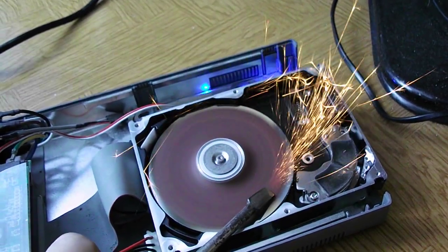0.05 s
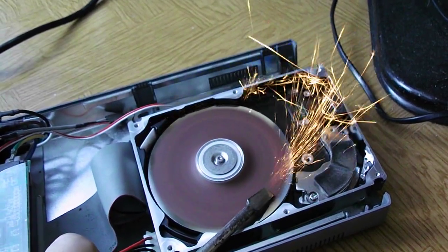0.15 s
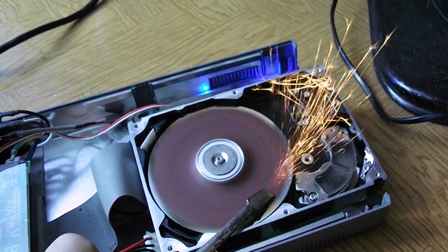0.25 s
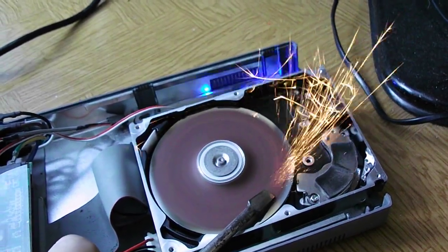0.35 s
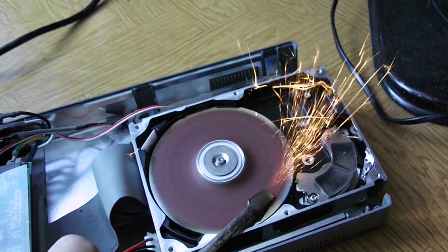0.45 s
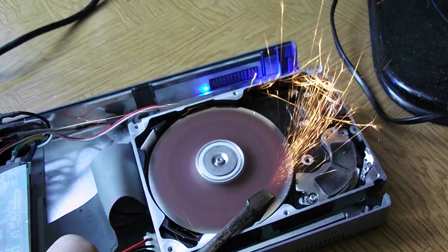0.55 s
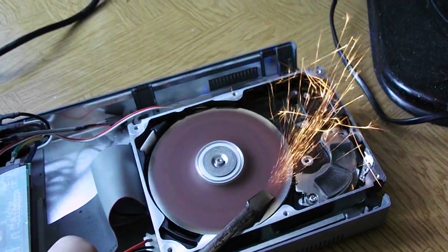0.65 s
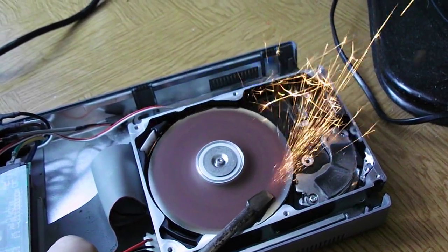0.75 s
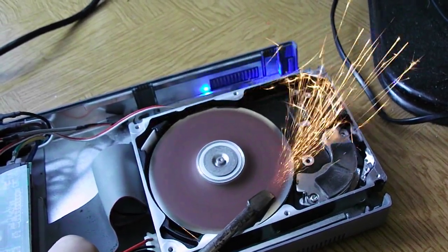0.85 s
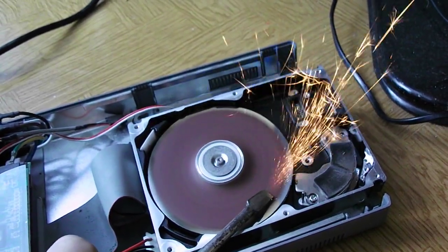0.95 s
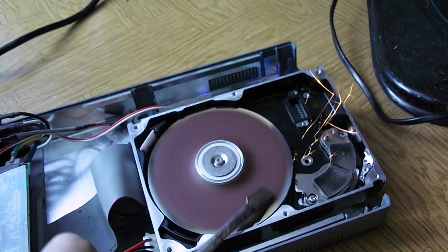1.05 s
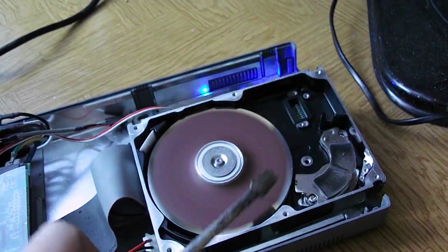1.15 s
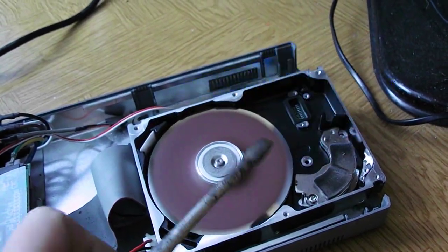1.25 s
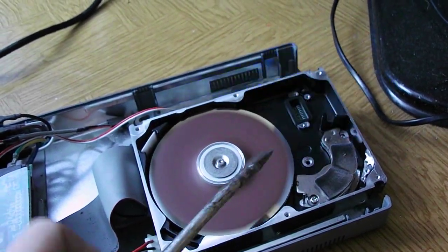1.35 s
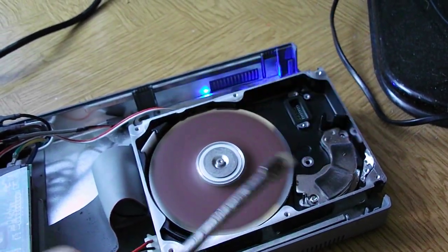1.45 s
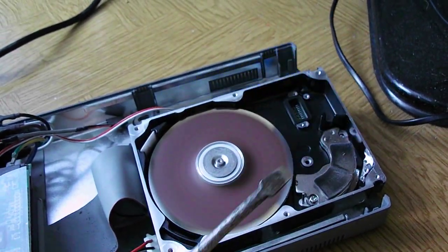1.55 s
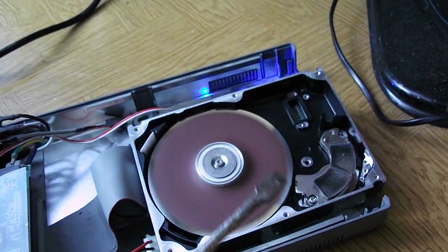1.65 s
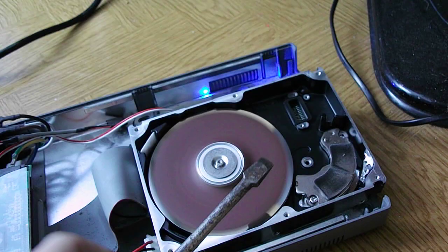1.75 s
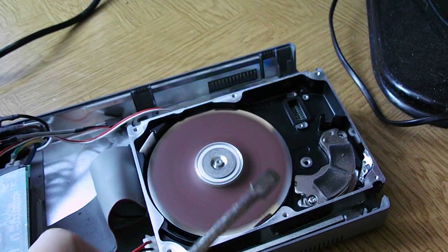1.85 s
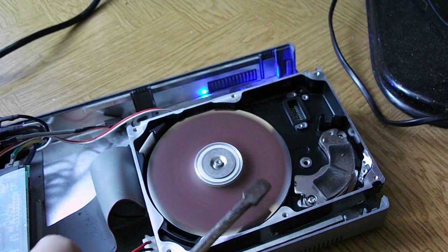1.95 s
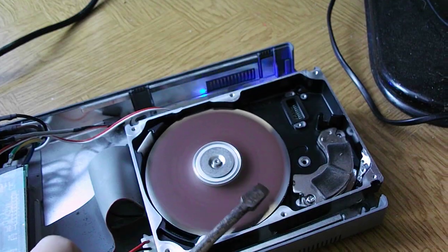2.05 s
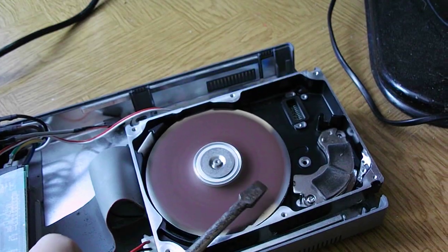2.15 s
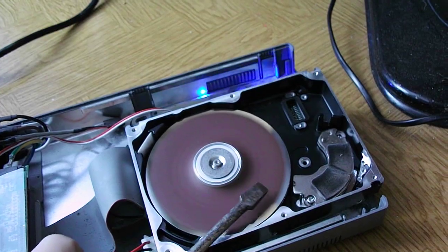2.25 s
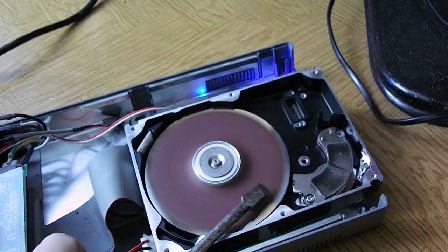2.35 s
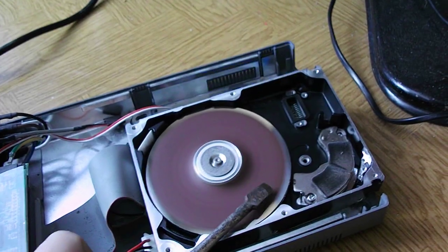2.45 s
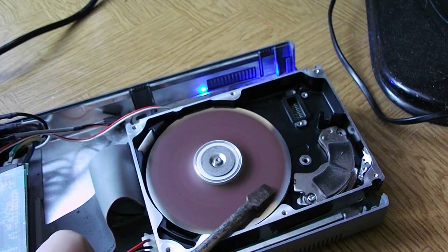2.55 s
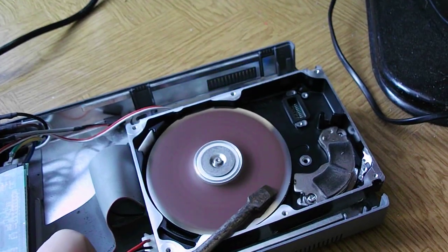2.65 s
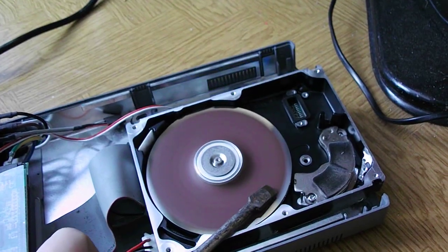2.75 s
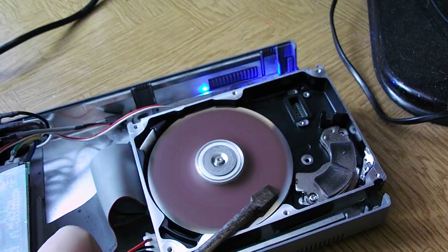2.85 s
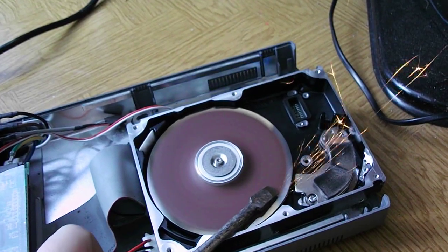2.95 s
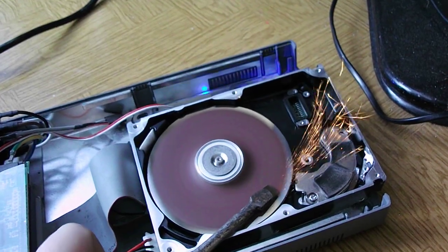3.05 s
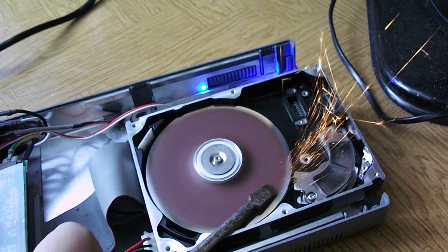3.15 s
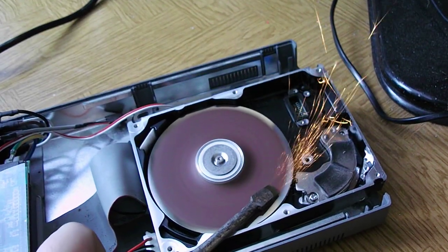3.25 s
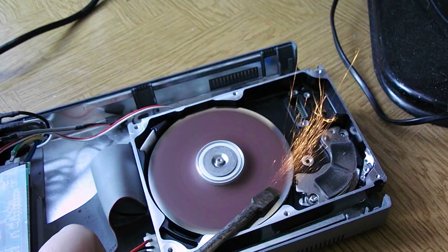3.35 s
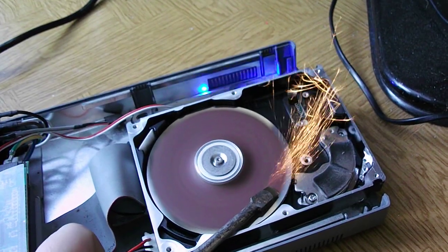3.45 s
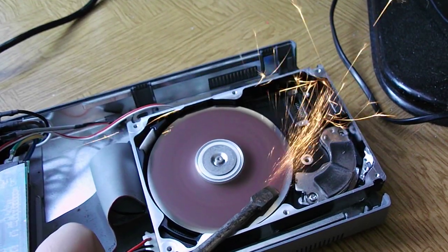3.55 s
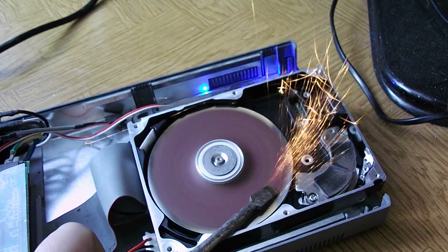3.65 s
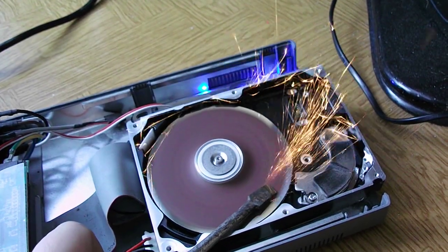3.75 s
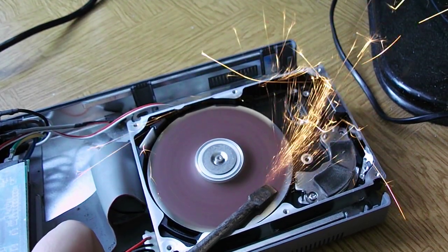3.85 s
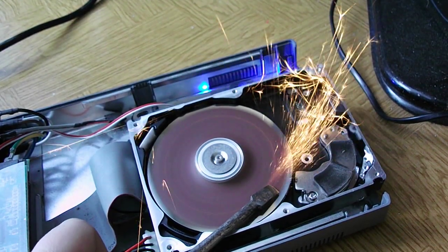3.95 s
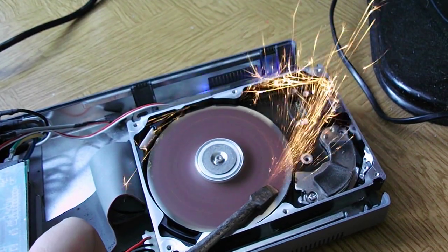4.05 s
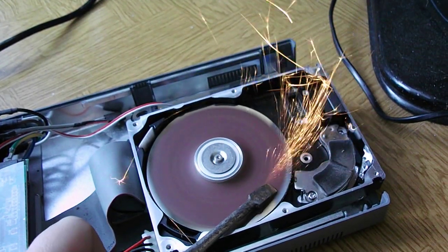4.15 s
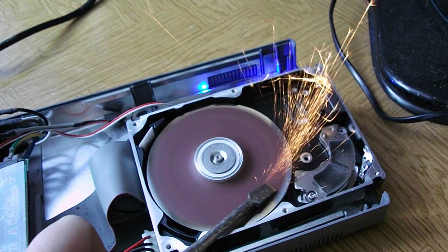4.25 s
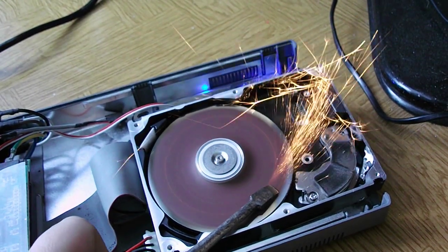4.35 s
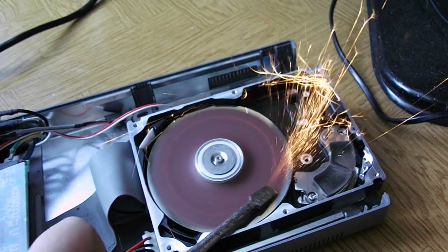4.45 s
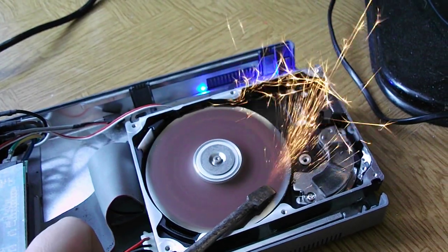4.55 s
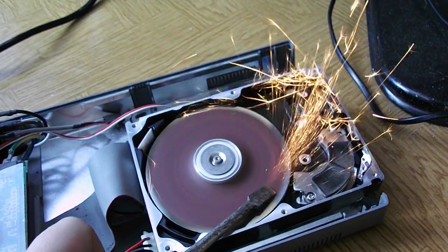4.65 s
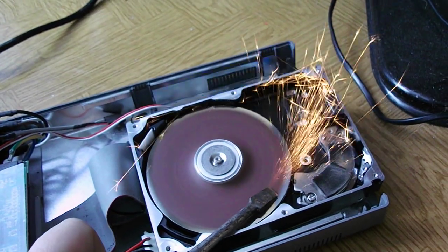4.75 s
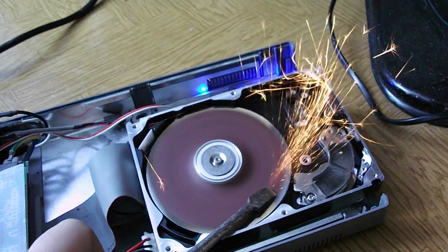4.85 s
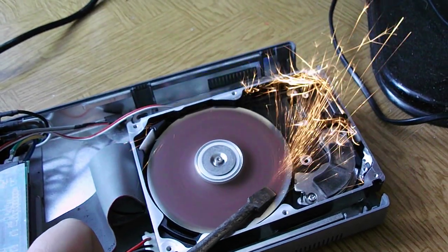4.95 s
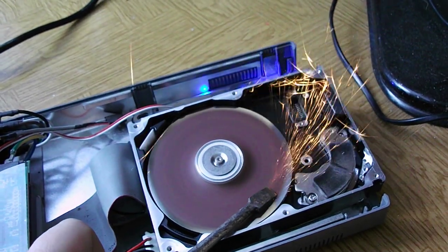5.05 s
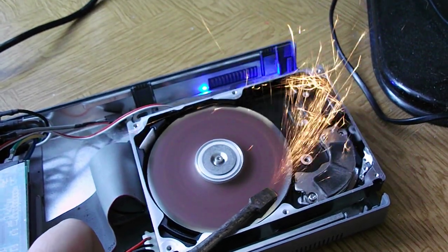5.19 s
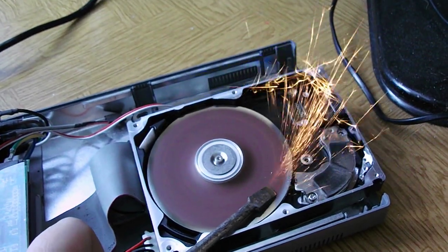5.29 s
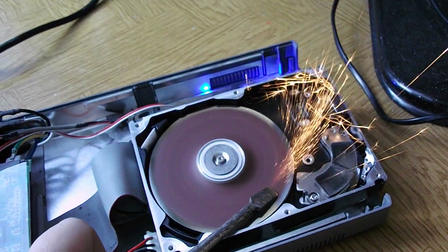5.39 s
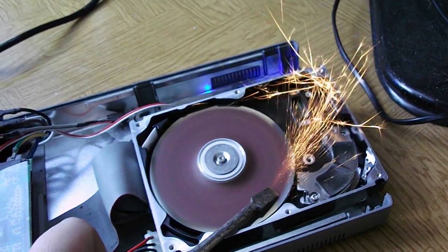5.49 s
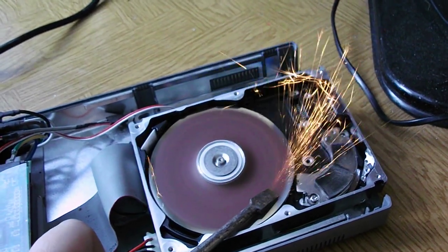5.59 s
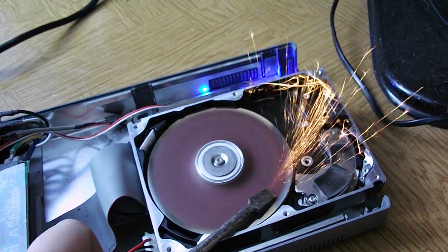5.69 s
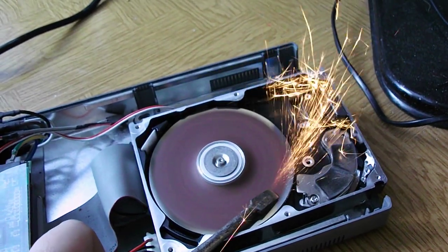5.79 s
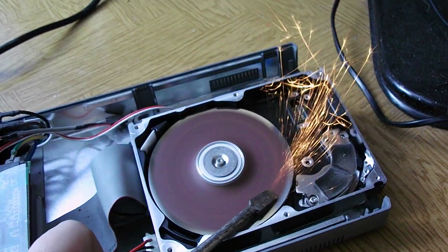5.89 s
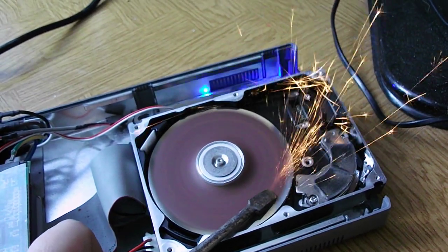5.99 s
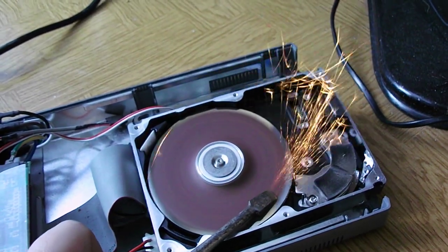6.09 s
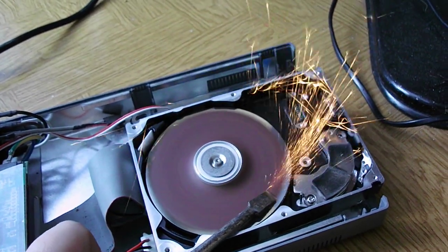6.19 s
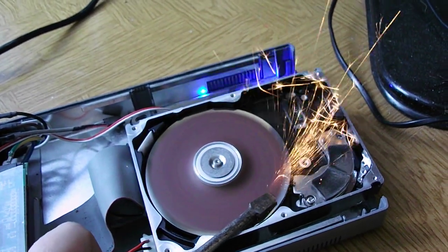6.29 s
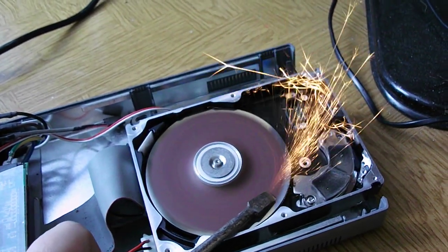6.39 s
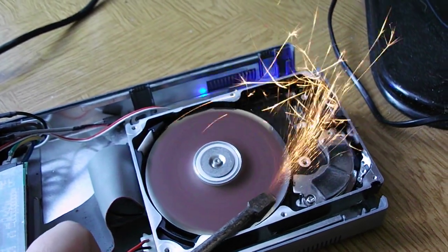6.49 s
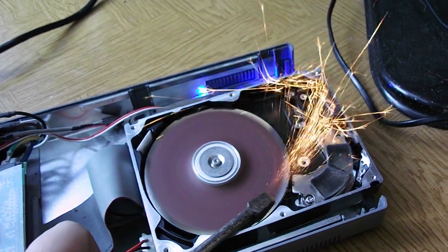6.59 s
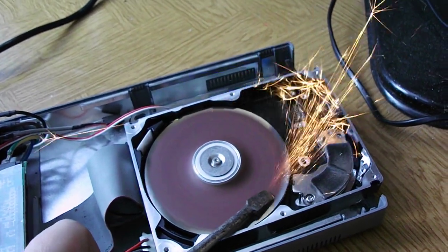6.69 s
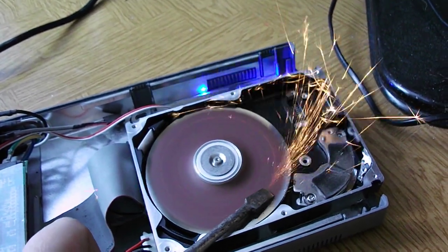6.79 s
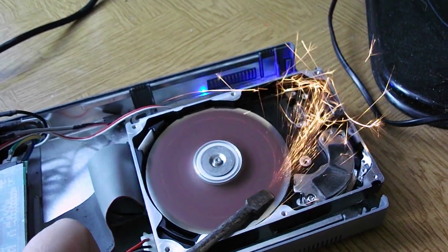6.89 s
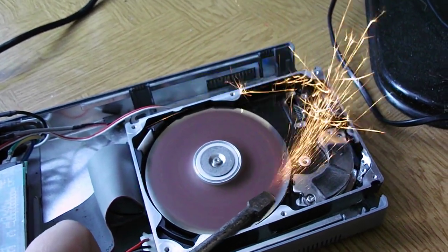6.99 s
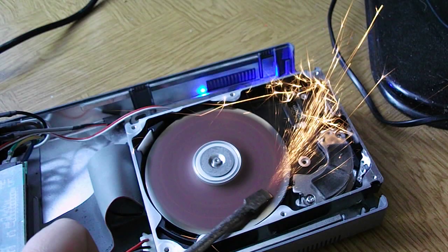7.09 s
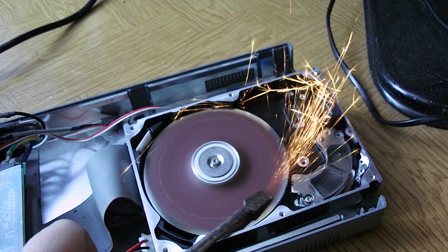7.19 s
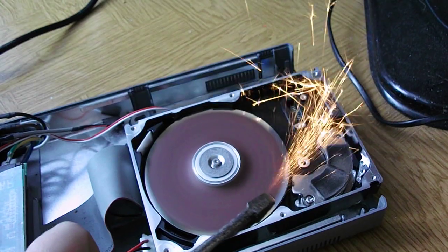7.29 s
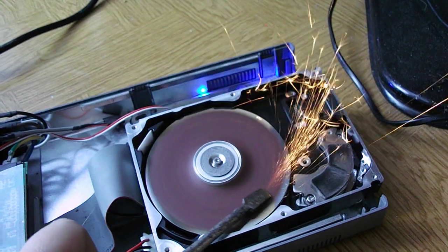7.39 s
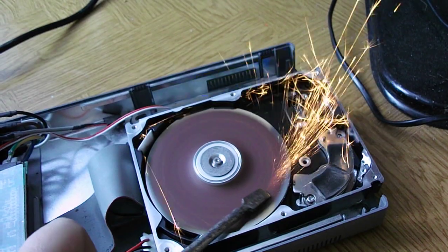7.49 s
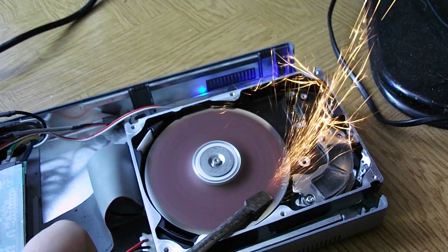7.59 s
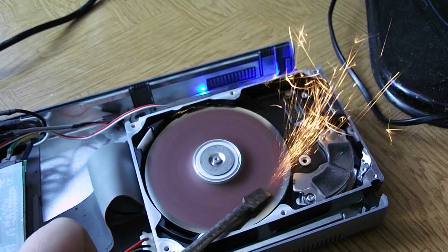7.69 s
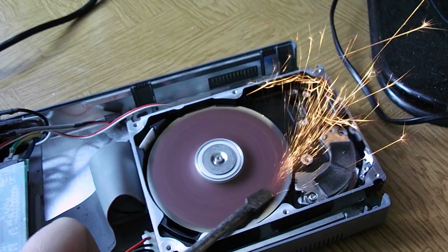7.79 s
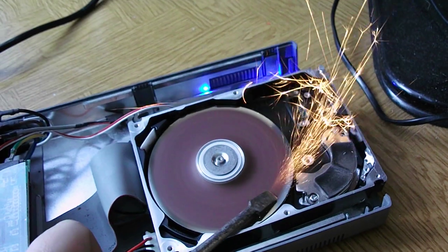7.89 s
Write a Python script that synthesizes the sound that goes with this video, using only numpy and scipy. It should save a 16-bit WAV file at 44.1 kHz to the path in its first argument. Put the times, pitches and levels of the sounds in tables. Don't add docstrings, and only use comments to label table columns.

```python
import sys
import numpy as np
from scipy import signal
from scipy.fft import rfft, irfft, next_fast_len
from scipy.io import wavfile
from scipy.ndimage import uniform_filter1d, map_coordinates

SR = 44100
rng = np.random.default_rng(int(sys.argv[2]) if len(sys.argv) > 2 else 0)


def boost_factor(decibels):
    exponent = np.asarray(decibels, float) / 20
    return 10 ** exponent


def digitize_waveform(pressure):
    field = np.atleast_2d(pressure).T
    bounded = np.clip(field, -1, 1)
    quanta = np.round(bounded * 32767).astype(np.int16)
    wavfile.write(sys.argv[1], SR, quanta)


N = 349707
T_S = np.arange(N) / SR


def unit(x):
    return x / np.sqrt(np.mean(x ** 2) + 1e-20)


def along(points, hz):
    f, v = np.transpose(points)
    return np.interp(np.log(hz + 1), np.log(f + 1), v)


def curves(rows):
    s, *cols = np.transpose(rows)
    return [np.interp(T_S, s, c) for c in cols]


def wobble(rate_hz):
    knots = rng.standard_normal(int(N * rate_hz / SR) + 4)
    return map_coordinates(knots, [np.arange(N) * rate_hz / SR])


def order(k, turns, phase=0):
    return np.sin(2 * np.pi * k * turns + phase)


def peaks(modes, hz):
    return 1 + sum((boost_factor(db) - 1) / (1 + (2 * (hz - centre) / width) ** 2) for centre, width, db in modes)


def coloured(x, gain):
    m = 8192
    cepstrum = irfft(np.log(gain(np.fft.rfftfreq(m, 1 / SR)) + 1e-6), m)
    cepstrum[1:m // 2] *= 2
    cepstrum[m // 2 + 1:] = 0
    return unit(signal.oaconvolve(x, irfft(np.exp(rfft(cepstrum)), m))[:N])


def band(hz, lo, hi):
    return np.sqrt(1 / (1 + (hz / hi) ** 12) - 1 / (1 + (hz / (lo + 1e-3)) ** 12) + 1e-9)


def steady(x, size):
    return x / np.sqrt(np.abs(uniform_filter1d(x ** 2, size)) + 1e-9)


def tipped(x, hz, db):
    under = signal.sosfiltfilt(signal.butter(6, hz, fs=SR, output="sos"), x)
    return boost_factor(db / 2) * under + boost_factor(-db / 2) * (x - under)


def patchy(x, depth_db):
    z = signal.stft(x, nperseg=512)[2]
    field = rng.standard_normal(z.shape)
    for size, axis in [(4, 0), (20, 1)] * 2:
        field = uniform_filter1d(field, size=size, axis=axis)
    return signal.istft(z * boost_factor(depth_db * unit(field)), nperseg=512)[1][:N]


CELLS = 340


def surface(rows, cells, memory, blur):
    fresh = rng.standard_normal((rows + 100, cells))
    worn = signal.lfilter([1], [1, -np.exp(-1 / memory)], fresh, axis=0)[100:]
    for _ in range(2):
        worn = uniform_filter1d(worn, blur, 1, mode="wrap")
    return unit(worn)


def passing(pairs, turns):
    return map_coordinates(pairs.ravel(), [turns * CELLS], mode="nearest")


# start_s, speed_turns_per_s
SPEED = [(0, 122.6), (1.04, 122.1), (1.24, 126.0), (1.5, 131.7), (1.84, 137.3), (2.24, 142.7),
         (2.64, 146.3), (3.1, 149.3), (3.44, 148.1), (3.7, 145.5), (4.04, 140.0), (4.44, 135.6),
         (4.84, 130.7), (5.44, 126.2), (5.84, 124.4), (6.44, 124.2), (6.7, 123.4), (7.93, 122.1)]


def shaft():
    speed, = curves(SPEED)
    return np.cumsum(speed) / SR, speed


LIFT_S, LAND_S, LIFT_FADE_S, LAND_FADE_S = 1.048, 2.925, 0.073, 0.0099


def touching():
    return np.clip(np.maximum(1 - (T_S - LIFT_S) / LIFT_FADE_S, (T_S - LAND_S) / LAND_FADE_S), 0, 1)


LOW_GAIN_DB, WAIT_S, RECOVER_DB_PER_S = -17.5, 0.16, 44.5


def quiet_gain_db():
    return np.clip(LOW_GAIN_DB + RECOVER_DB_PER_S * (T_S - LIFT_S - WAIT_S), LOW_GAIN_DB, 0)


# start_s, pressure_db, lean_db (on the case), grip_db, edge_db
HAND = [(0, -17, -3.5, 1.5, 1), (.4, -15, -5, 8.5, -0.5), (1.05, -15, -7, 5, 1), (3.0, -21, -1.5, -8, 1.5),
        (3.2, -18, -5, -2, 9.5), (3.3, -13, -10, 15, -1), (3.56, -21, 7, -5, 0.5), (4.0, -18, 2.5, 3, -0.5),
        (4.12, -17, 2.5, -1.5, -2), (4.4, -20, 1, 2.5, 2), (4.7, -16, -1, 3.5, 0), (5.05, -16, -2.5, 14, 1),
        (5.22, -20, 1.5, 0, 4), (5.45, -17.5, -3.5, 0, 2.5), (6.0, -15.5, -0.5, -3, 1.5),
        (6.42, -17.5, -4, 3.5, -0.5), (6.78, -17, 0, -2.5, -1), (7.1, -16.5, -3.5, 0.5, 1)]


def hand():
    return curves(HAND)


def whistle():
    tone = boost_factor(0.54 * quiet_gain_db() - 46) * np.sin(2 * np.pi * 15625 * T_S)
    hiss = boost_factor(-60) * coloured(rng.standard_normal(N), lambda hz: band(hz, 3000, 13500))
    return (1 - touching()) * tone + hiss


# freq_hz, level_db
RUMBLE = [(12, -32), (20, -2), (65, -3), (78, -3), (91, -24), (110, 0), (140, -27), (240, -120)]


def rumble():
    level_db = np.interp(T_S, [0, 1.2, 2.9, 3.1], [-53.5, -57, -52, -60]) + 6.7 * wobble(5.0)
    return boost_factor(level_db) * coloured(rng.standard_normal(N), lambda hz: boost_factor(along(RUMBLE, hz)))


# start_s, peak_db
KNOCKS = [
    (0.168, -49),
    (1.189, -57),
    (3.339, -29),
    (3.569, -31),
]


def knocks():
    out = np.zeros(N)
    u = np.arange(SR // 10) / SR / 0.0064
    push = u * (1 - u / 2.3) * np.exp(-u)
    for start_s, peak_db in KNOCKS:
        out[round(start_s * SR):][:len(u)] -= boost_factor(peak_db + 10) * push
    return out


# shaft_hz, first_db, next_db, first_load_db, next_load_db
TABLE_ANSWER = [(117, -37, -32, -54, -63), (120, -36, -35, -54, -60), (131, -39.5, -35.5, -56, -48),
                (138.3, -36.5, -36.5, -56, -48), (143.8, -33, -33.5, -56, -49), (145.8, -29, -38, -46, -50),
                (150.6, -36.5, -45, -40, -53)]
# shaft_multiple, level_db
HUM_ORDERS = [
    (.5, -27),
    (1.5, -14.5),
    (2, 0.5),
    (2.5, -14.5),
    (3, -7.5),
]


def hum(turns, speed):
    hz, *columns = np.transpose(TABLE_ANSWER)
    first_db, next_db, first_load_db, next_load_db = [np.interp(speed, hz, c) for c in columns]
    on, gain_db = touching(), quiet_gain_db()
    upper = sum(boost_factor(db + 0.61 * wobble(12)) * order(k, turns, k) for k, db in HUM_ORDERS)
    first = on * boost_factor(first_load_db) + (1 - on) * boost_factor(first_db + gain_db)
    more = on * boost_factor(next_load_db + 4.1 * wobble(4.5)) + (1 - on) * boost_factor(next_db + gain_db)
    return boost_factor(4.0) * first * order(1, turns) + more * upper


# shaft_multiple, level_db
POLE_ORDERS = [(9, -1), (36, 1), (54, -23), (72, 2), (90, -4)]
# freq_hz, level_db (against the rush)
WHINE_MODES = [(1130, -7.5), (1260, -26), (4450, -15), (4780, -5), (4940, 2.5), (5040, -10), (5350, -15),
               (8850, -9.5), (9400, -9.5), (9600, 3.5), (9780, -17), (10080, -4.5), (10400, -26),
               (10700, -45)]


def whine(turns, speed):
    out = 0
    for k, db in POLE_ORDERS:
        out = out + boost_factor(db + 1.5 * wobble(25.74) + along(WHINE_MODES, k * speed)) * order(k, turns)
    return out


# freq_hz, level_db
RUSH = [(120, -81), (200, -5.5), (333, -23), (584, -9.5), (800, -13.5), (1560, -11), (2600, -6.5),
        (5000, -7), (9000, -18), (12000, -26.5), (14300, -44), (14700, -72)]
# freq_hz, width_hz, level_db
LOOSE = [(1230, 280, 11.9), (2130, 370, 12.2), (2990, 450, 12.1), (4740, 160, 4.2), (6760, 105, 10.6),
         (7610, 49, 11.7), (12900, 290, 17.6)]
MID_SPIN_HZ, RIM_SPLIT_HZ, RIM_TOP_HZ = 141.7, 3700, 30000
RUSH_DB, RUSH_DB_PER_HZ, HISS_DB, HISS_DB_PER_HZ = -18, 0.23, -1, -0.13
SHADE_S, SHADE_LONG_S, SHADE_DB = 2.8, 0.073, -4.5
RATTLE_DB, RATTLE_DB_PER_HZ, RATTLE_LEAN = -28, 0.82, 0.25


def free_running(turns, speed):
    faster = speed - MID_SPIN_HZ
    low_db = RUSH_DB + RUSH_DB_PER_HZ * faster + quiet_gain_db()
    shade_db = SHADE_DB * np.exp(-((T_S - SHADE_S) / SHADE_LONG_S) ** 2)
    high_db = HISS_DB + HISS_DB_PER_HZ * faster + shade_db
    loaded_db = RATTLE_DB + RATTLE_DB_PER_HZ * faster + RATTLE_LEAN * hand()[1]

    locked = passing(surface(int(turns[-1] / 2) + 2, 2 * CELLS, memory=8.8, blur=1), turns)
    rim = 0.79 * locked + rng.standard_normal(N)
    rattle = rim * boost_factor(0.54 * wobble(180) + 0.96 * wobble(29.91))

    def part(lo, hi):
        gain = lambda hz: boost_factor(along(RUSH, hz)) * peaks(LOOSE, hz) * band(hz, lo, hi)
        return steady(coloured(rattle, gain), size=6000)

    low, high = part(0, RIM_SPLIT_HZ), part(RIM_SPLIT_HZ, RIM_TOP_HZ)
    loaded = part(1980, RIM_SPLIT_HZ)
    free = boost_factor(low_db) * (low + whine(turns, speed)) + boost_factor(low_db + high_db) * high
    return touching() * boost_factor(loaded_db) * loaded + (1 - touching()) * free


# start_s, end_s, bounce_share (every second turn, 0-1), loose_share (never repeats, 0-1)
SPELLS = [(0, .8, 0.83, 0.08), (0.807, 1.084, 1, 0.55), (2.978, 3.06, 0.2, 0.3), (3.06, 3.203, .04, 0.16),
          (3.36, 3.676, 0.23, 0.7), (3.683, 3.8, 0.18, 0.13), (3.806, 4.027, 0.33, 0.04),
          (4.485, 4.6, .15, .15), (4.585, 4.696, 0.8, 0.4), (4.698, 4.835, .15, 0), (5.15, 5.39, 0.09, 0),
          (5.37, 5.497, 0.72, 0.6), (5.493, 5.6, 1, 0.3), (5.59, 5.69, 0.5, .15), (5.686, 6.01, 0.93, 0.1),
          (5.99, 6.09, 0.43, 0.3), (6.592, 6.789, 0.64, 0.1), (6.798, 7.204, 0.92, .2),
          (7.202, 7.936, 0.93, 0.34)]
STILL_LOOSE, SPELL_FADE_S = 0.033, 0.053


def contact():
    bounce, loose = np.zeros(N), np.full(N, STILL_LOOSE)
    for start_s, end_s, bounce_share, loose_share in SPELLS:
        spell = (T_S >= start_s) & (T_S < end_s)
        bounce[spell], loose[spell] = bounce_share, loose_share
    faded = uniform_filter1d(np.array([bounce, loose]), round(SPELL_FADE_S * SR) + 1, axis=1)
    return np.clip(1 - faded, 0, 1)


# shaft_multiple, level_db
FACET_ORDERS = [
    (4, -17.5),
    (8, -13),
    (9, -27),
]
# freq_hz, width_hz, level_db
FACET_MODES = [(519, 24, 12.5), (591.5, 8.3, 11.5), (1153, 130, 14)]


def facet_beat(angle, speed):
    out = 0
    for k, db in FACET_ORDERS:
        out = out + boost_factor(db + 2.3 * wobble(2.79)) * peaks(FACET_MODES, k * speed) * order(k, angle)
    return out


# level_db (over pressure), lean_share, edge_share
ANSWERS = [
    (-14.5, 0.36, 0.77),
    (-0.5, 1, 0.29),
    (0.5, 0.038, 0),
    (-4.5, 0.41, 1),
]
LAND_DB, LAND_DIES_S = 15.5, 0.015


def bite_levels(pressure_db, lean_db, edge_db):
    since = T_S - LAND_S
    force_db = pressure_db + LAND_DB * (since > 0) * np.exp(-np.abs(since) / LAND_DIES_S)
    return [touching() ** 2 * boost_factor(force_db + db + lean * lean_db + edge * edge_db)
            for db, lean, edge in ANSWERS]


BOUNCE_DEPTH = 0.78


def disc_face(rows, single):
    def mix(memory, blur):
        every = np.tile(surface(rows, CELLS, memory, blur), 2)
        second = surface(rows, 2 * CELLS, memory, 2 * blur - 1)
        return np.sqrt(single) * every + np.sqrt(1 - single) * second

    grit, spots = mix(60, 1), mix(40, 20)
    dust = rng.standard_normal((rows, 2 * CELLS))
    spots = 2.95 * np.tanh(spots / 1.9) * (single + BOUNCE_DEPTH * (1 - single))
    return grit, spots, dust


def evened(bite):
    lines = rfft(bite)
    even = uniform_filter1d(np.abs(lines) ** 2, size=8, axis=1)
    even = uniform_filter1d(even, size=5, axis=0)
    return irfft(lines / np.sqrt(np.abs(even) + 1e-9))


# freq_hz, level_db
RASP = [(120, -50), (200, -30), (450, -38), (520, -22), (950, -24), (1500, -17), (2600, -10), (3800, -8),
        (6000, -8), (9300, -9), (11000, -14), (13000, -19), (14500, -25), (15800, -27)]
# freq_hz, width_hz, level_db (over the smooth colour)
CASE = [(1143, 32.5, 16.5), (1317, 84, 11.5), (1734, 36, 10.5), (1993, 84, 14), (2240, 116, 14),
        (3025, 294, 16), (3490, 110, 7), (4490, 540, 12.5), (4750, 88, -2.5), (5410, 680, 9),
        (6800, 290, 4.5), (9900, 400, 2)]
EDGES_HZ = [0, 1600, 3700, 7000, 30000]
SPLITS_HZ = [800, 2600, 5000, 10000]
HIGH_GRIP_DB, HIGH_GRIP_LEAN, HIGH_GRIP_SHARE = 1.1, -0.65, .2
RING_SHARPNESS, PATCH_DB = 1.14, 1.74
SPOT_DB, LOOSENESS = [2.5, 3.8, 4.4, 6.2], [.2, 0.42, 0.36, 0.92]


def grind(turns, speed):
    rows = int(turns[-1] / 2) + 2
    at = np.searchsorted(turns, 2 * np.arange(rows) + 1).clip(0, N - 1)
    steadiness = contact()
    single, repeat = steadiness[:, at, None]
    grit, spots, dust = disc_face(rows, single)

    angle = turns + speed * 1e-6 * (12 * wobble(45) + 22 * wobble(9))
    facets = (0.59 + 0.43 * steadiness[0]) * facet_beat(angle, speed)

    pressure_db, lean_db, low_grip_db, edge_db = hand()
    high_grip_db = HIGH_GRIP_DB + HIGH_GRIP_LEAN * lean_db + HIGH_GRIP_SHARE * low_grip_db
    grip_db = [0, low_grip_db, high_grip_db, 0]
    levels = bite_levels(pressure_db, lean_db, edge_db)

    out = 0
    for k, level in enumerate(levels):
        dusty = np.clip(LOOSENESS[k] * (1 - repeat), 0, 1)
        bite = (np.sqrt(1 - dusty) * grit + np.sqrt(dusty) * dust) * boost_factor(SPOT_DB[k] * spots)
        force = passing(evened(bite), angle)
        sharpness = RING_SHARPNESS if k == 1 else 1
        gain = lambda hz: boost_factor(along(RASP, hz)) * peaks(CASE, hz) ** sharpness * band(hz, *EDGES_HZ[k:k + 2])
        ringing = tipped(coloured(force, gain), SPLITS_HZ[k], grip_db[k])
        ringing = steady(patchy(ringing, PATCH_DB), size=2900)
        if k == 0:
            ringing = ringing + facets
        out = out + level * ringing
    return out


# freq_hz, lead_rad
LEAD = [(0, 0), (2300, -.03), (2900, -.4), (12700, -1.81), (22050, -np.pi)]


def two_ports(mono):
    m = next_fast_len(N)
    half = np.interp(np.fft.rfftfreq(m, 1 / SR), *np.transpose(LEAD)) / 2
    return irfft(rfft(mono, m) * np.exp(1j * np.array([half, -half])), m)[:, :N]


def scene():
    turns, speed = shaft()
    background = rumble() + knocks() + hum(turns, speed)
    return two_ports(background + free_running(turns, speed) + grind(turns, speed))


# first_s, last_s, step_db
DUCKS = [(.07, .07, -2.2), (0.225, 0.97, -3), (.648, 0.85, -3), (.862, 0.92, -3), (1.68, 1.5, -3),
         (1.96, 1.97, -3.5), (2.395, 2.34, -4.5), (3.008, 3.3, -1), (3.186, 3.301, -4.5), (3.479, 3.479, 5),
         (3.626, 3.8, -3.5), (3.763, 3.8, -4), (4.046, 4.15, -4), (4.165, 6.2, -2.7), (4.373, 3.9, -5),
         (4.517, 5.2, -2.5), (4.73, 4, -3), (5.01, 4.74, -1.5), (5.137, 6.05, -2), (5.705, 5.705, -5),
         (5.819, 5.7, -4.2), (6.012, 7.3, -3.5), (6.201, 4.8, -2.3), (6.404, 4.9, -3), (6.518, 6.645, -2.5),
         (6.803, 10.6, -2), (7.01, 6.5, -3.5), (7.242, 7.241, -3.5), (7.429, 6.5, -3), (7.797, 8.8, -4.5)]
PUMP_S, CLIMB_DB_PER_S = .08, 50


def gain_control():
    db = np.zeros(N)
    for first_s, last_s, step_db in DUCKS:
        steps = max(round((last_s - first_s) / PUMP_S), 0) + 1
        for s in np.linspace(first_s, last_s, steps):
            span = slice(round(s * SR), round(s * SR) + SR // 4)
            since = T_S[span] - s
            drop_db = step_db * np.minimum(since / 0.002, 1)
            db[span] += np.minimum(drop_db + CLIMB_DB_PER_S * since, 0)
    return boost_factor(db - 0.67)


def top_cut(x):
    return signal.sosfilt(signal.butter(12, 15840, fs=SR, output="sos"), x)


def record(dry):
    held = (dry + whistle()) * gain_control()
    held = held / (1 + np.abs(held / 0.84) ** 6) ** (1 / 6)
    return top_cut(held)


dry = scene()
out = record(dry)
digitize_waveform(out)
```